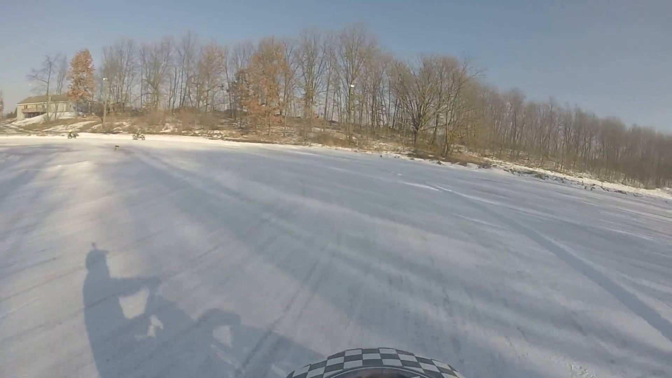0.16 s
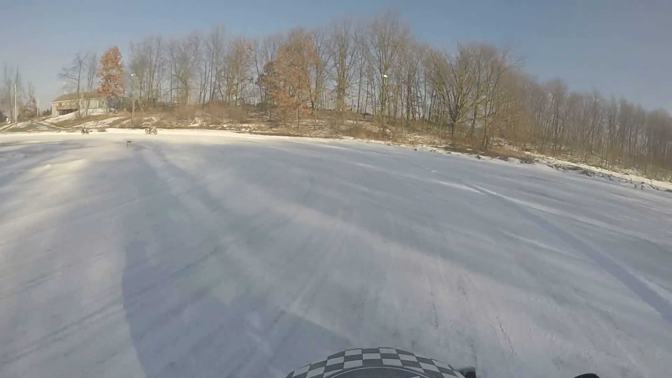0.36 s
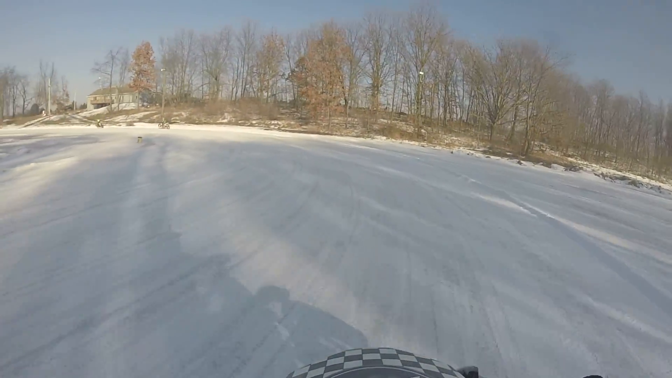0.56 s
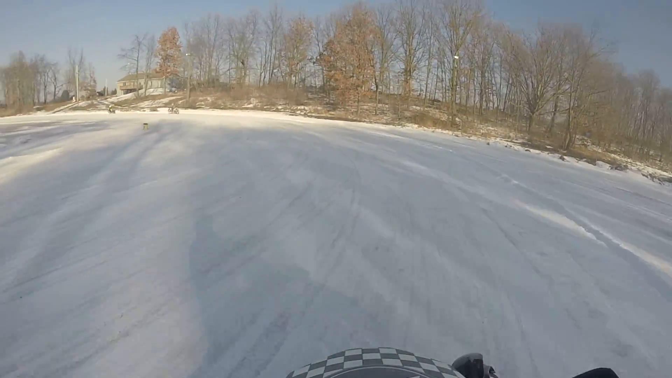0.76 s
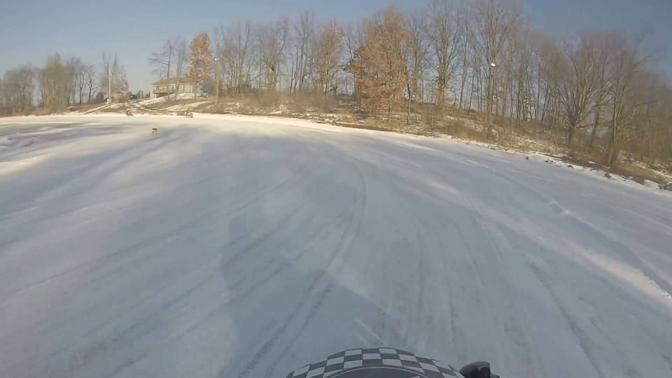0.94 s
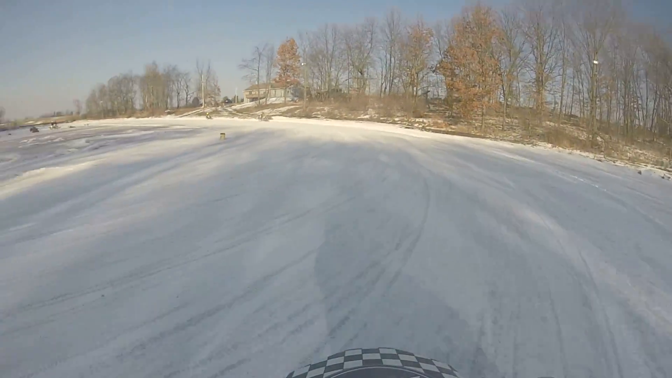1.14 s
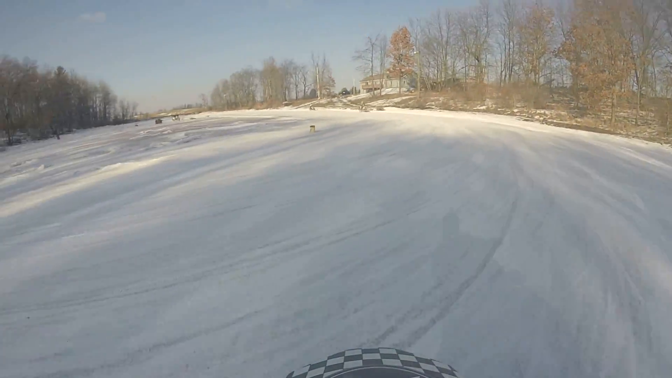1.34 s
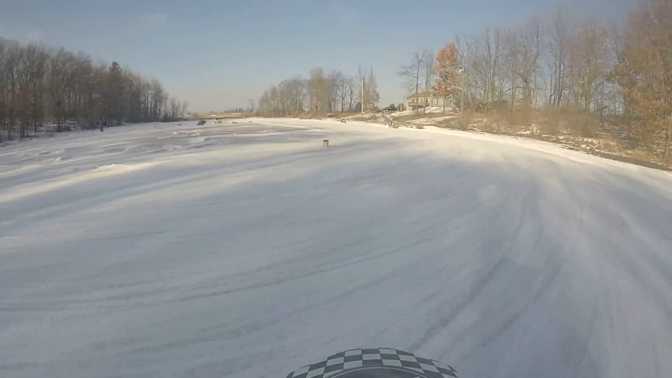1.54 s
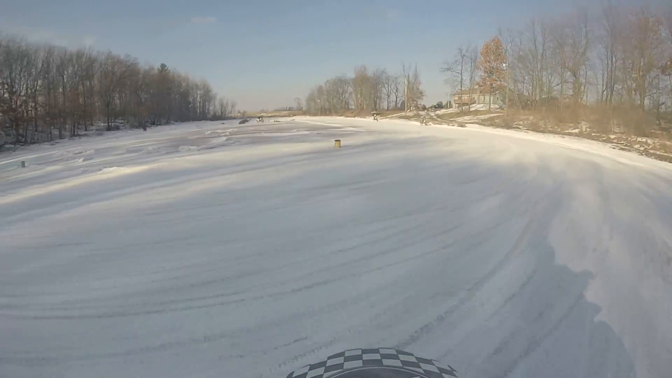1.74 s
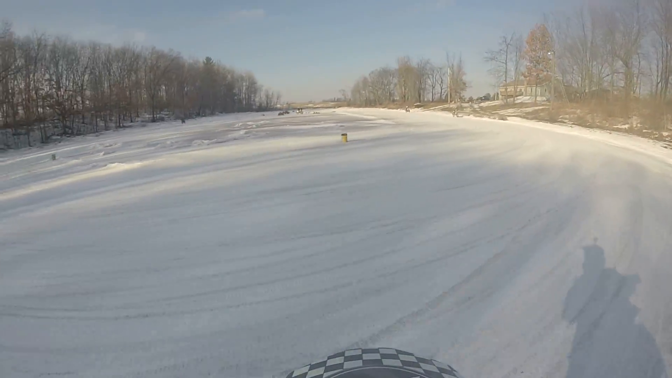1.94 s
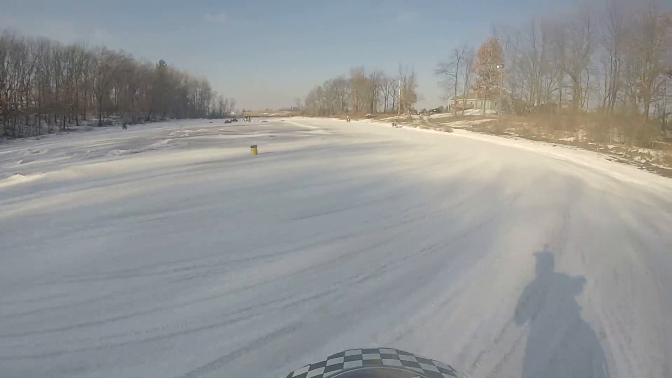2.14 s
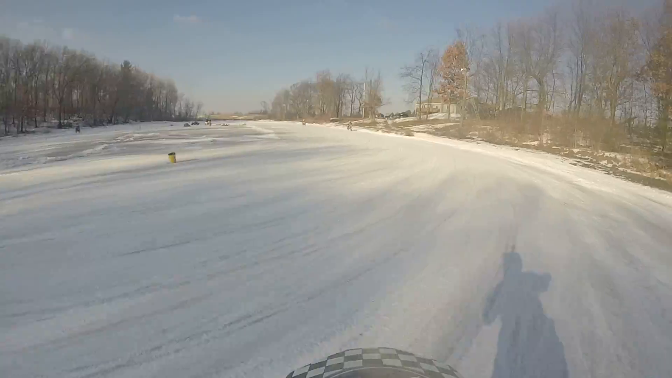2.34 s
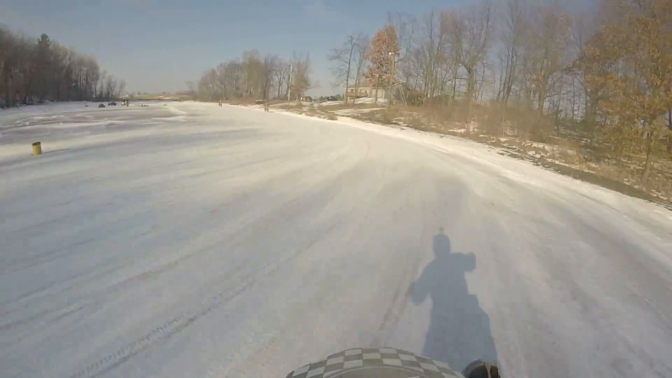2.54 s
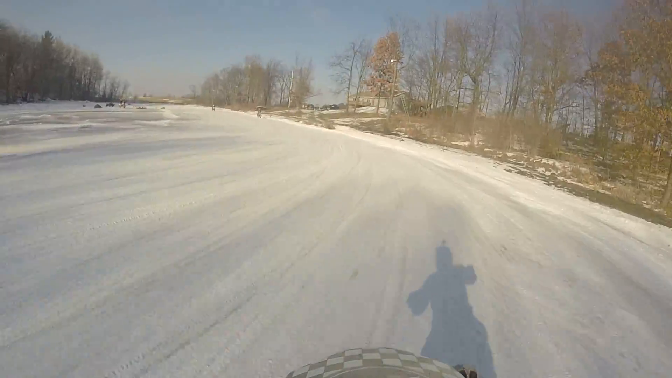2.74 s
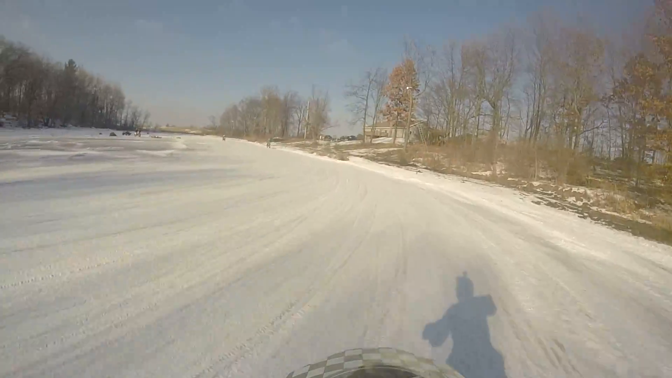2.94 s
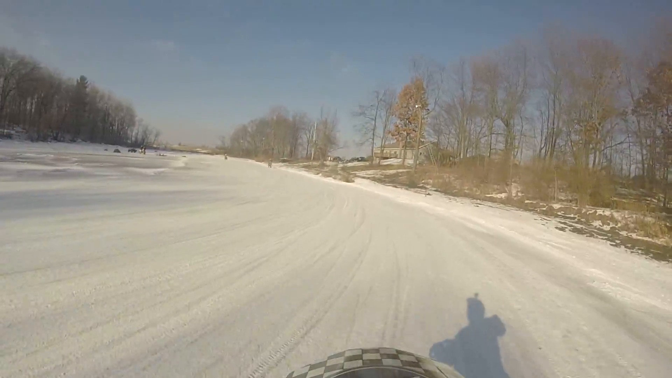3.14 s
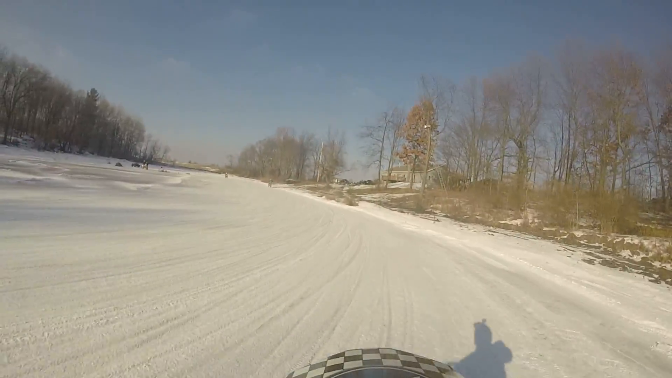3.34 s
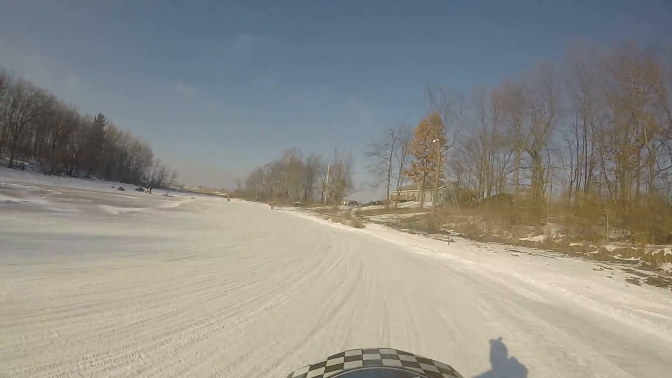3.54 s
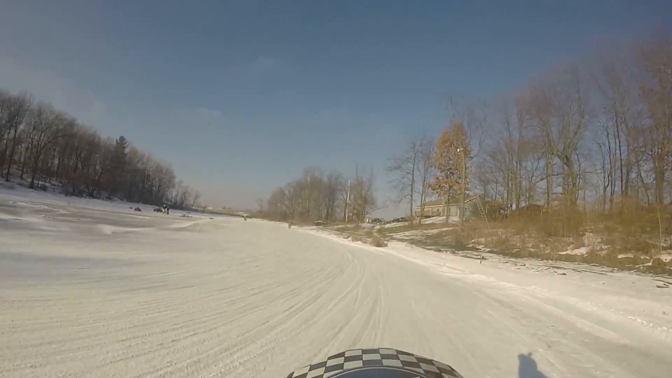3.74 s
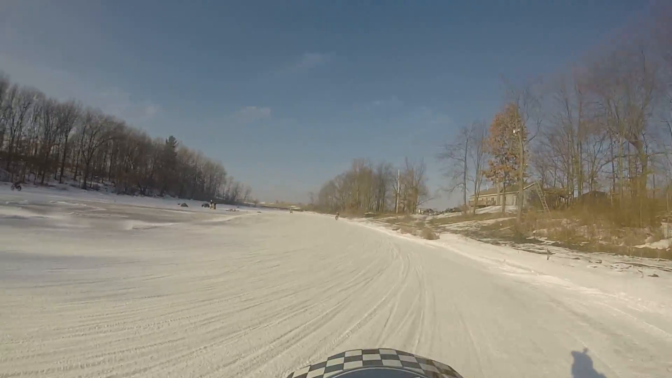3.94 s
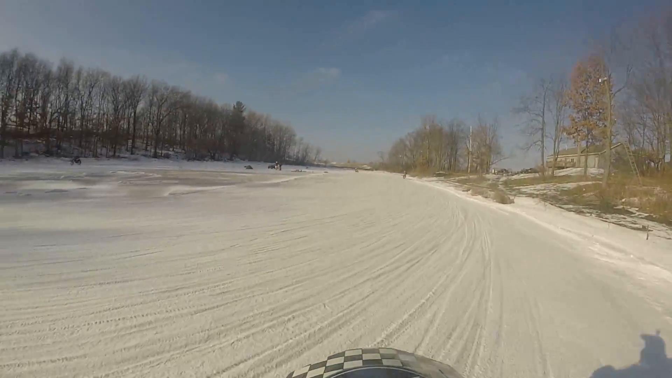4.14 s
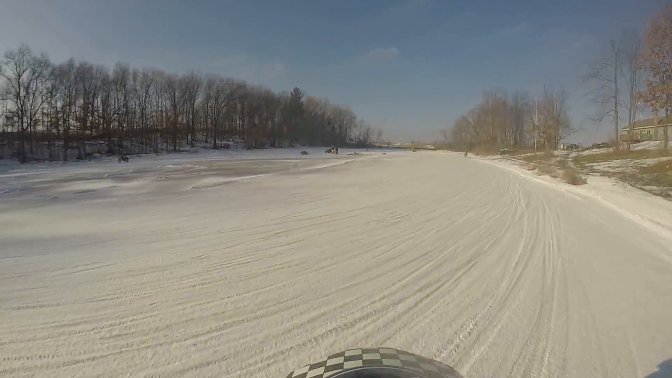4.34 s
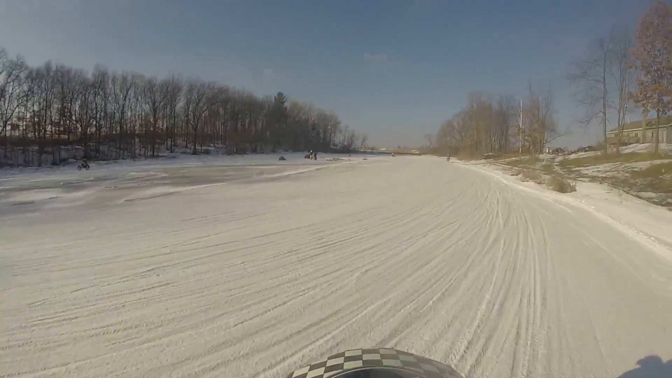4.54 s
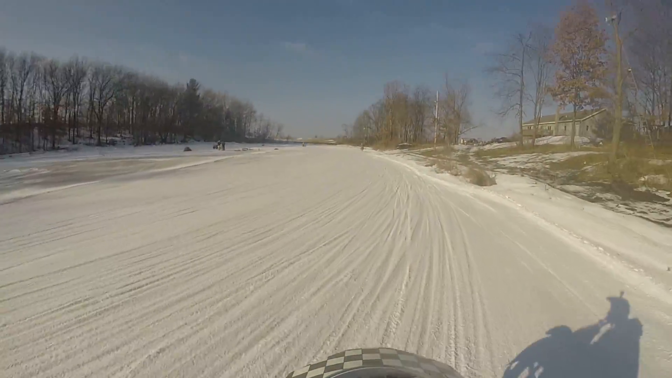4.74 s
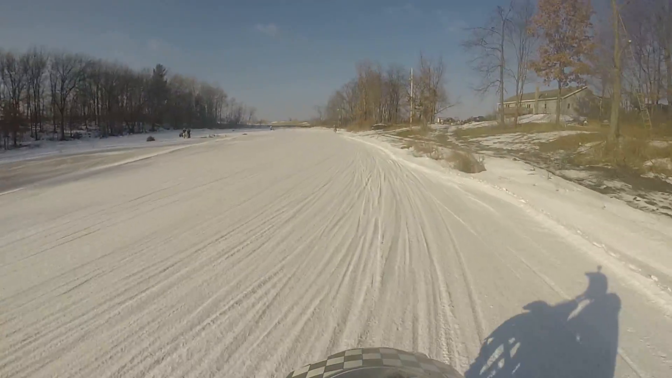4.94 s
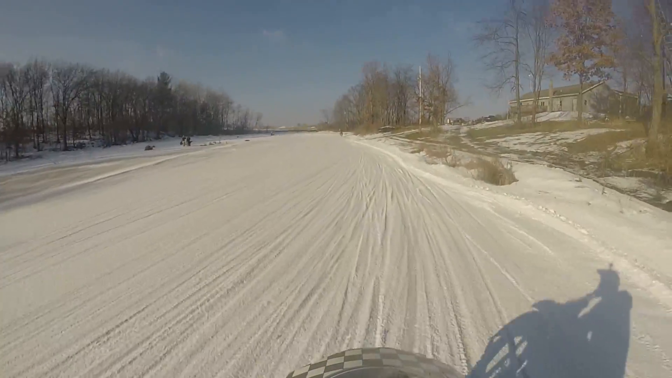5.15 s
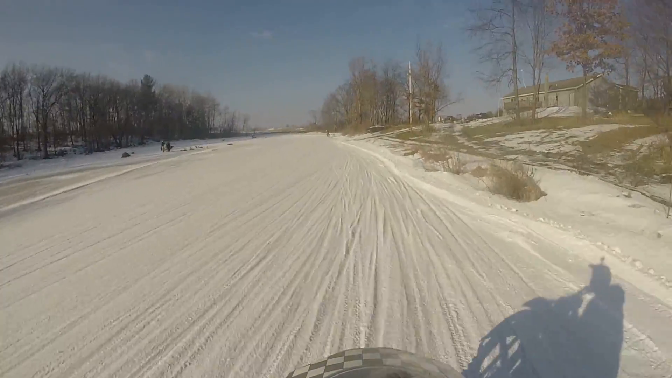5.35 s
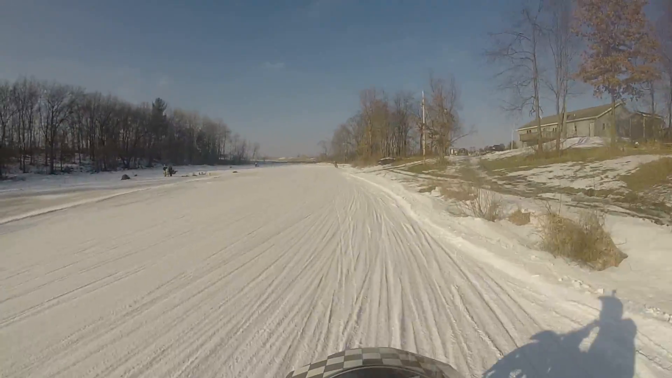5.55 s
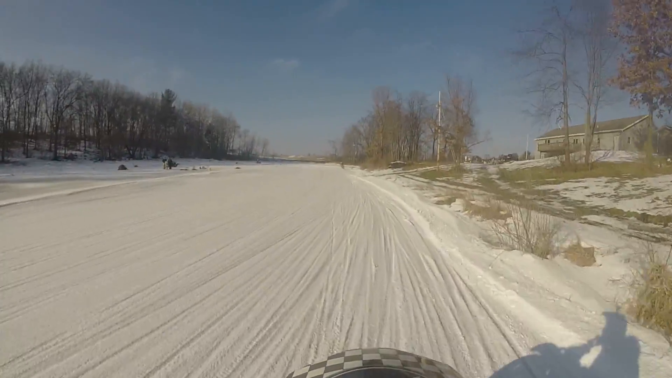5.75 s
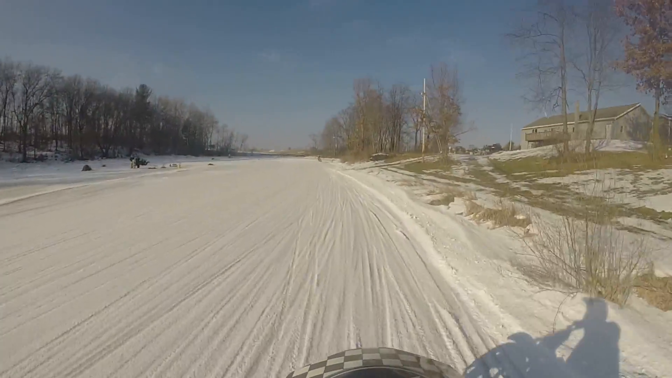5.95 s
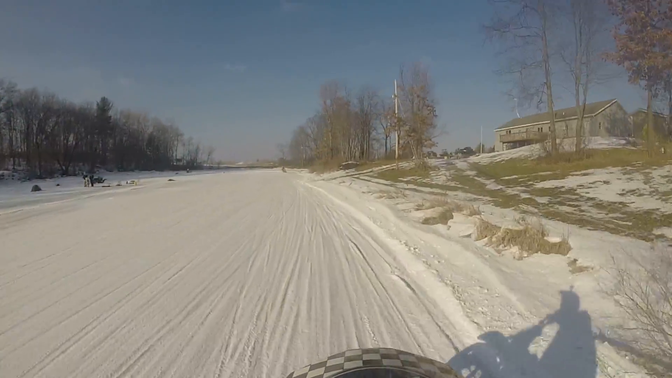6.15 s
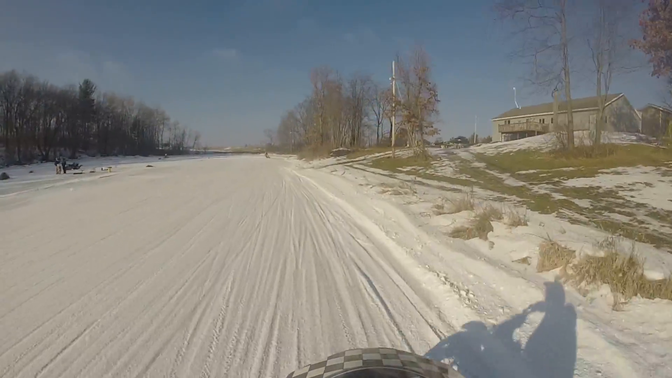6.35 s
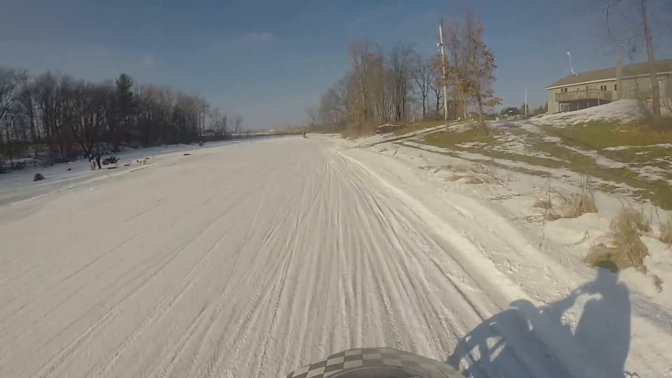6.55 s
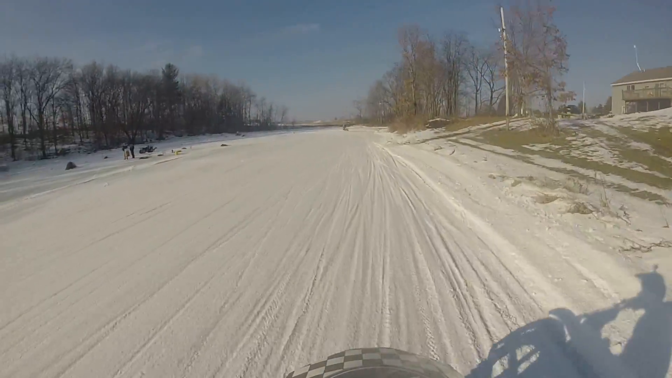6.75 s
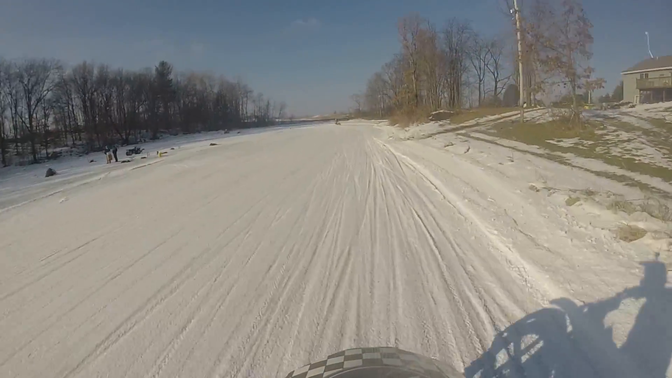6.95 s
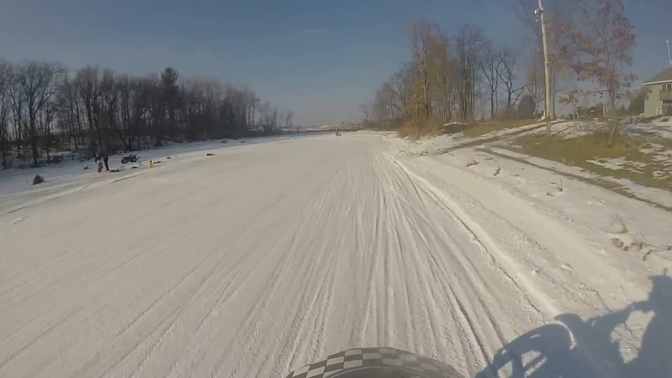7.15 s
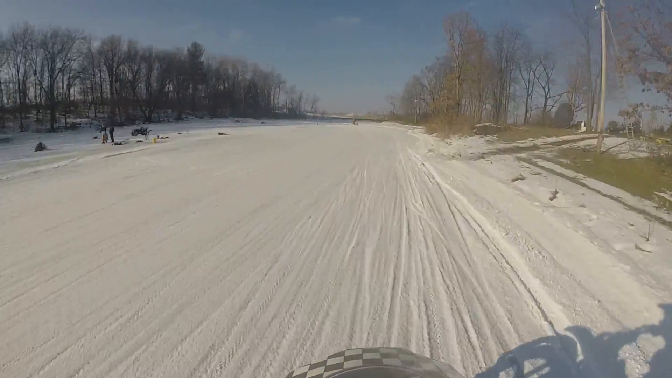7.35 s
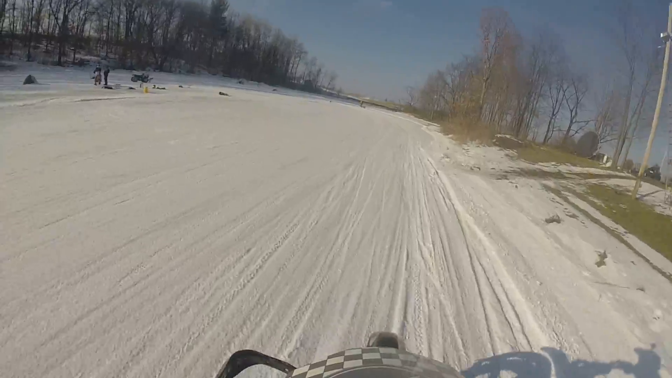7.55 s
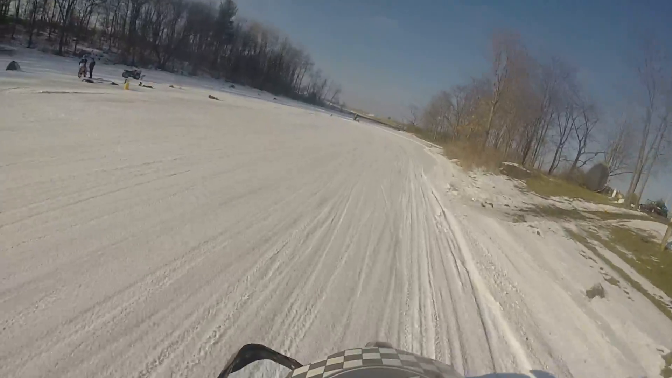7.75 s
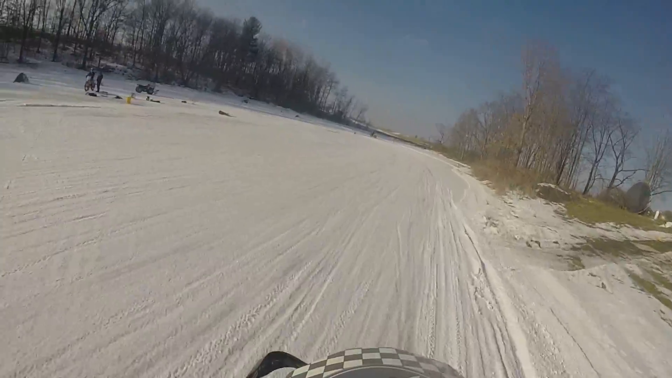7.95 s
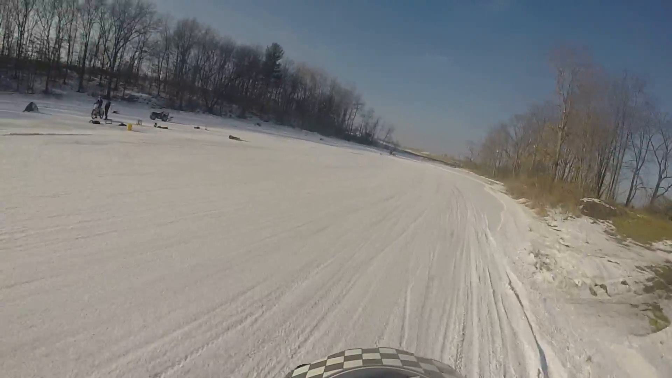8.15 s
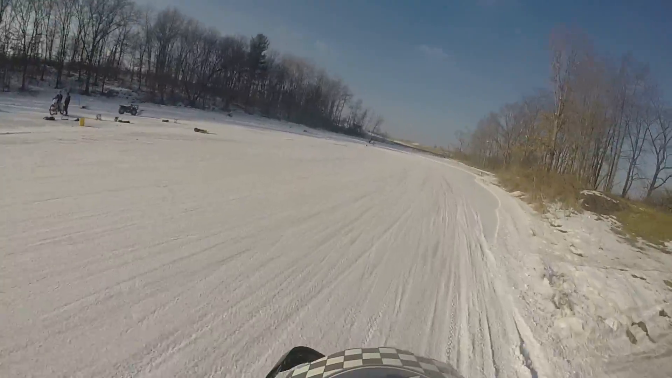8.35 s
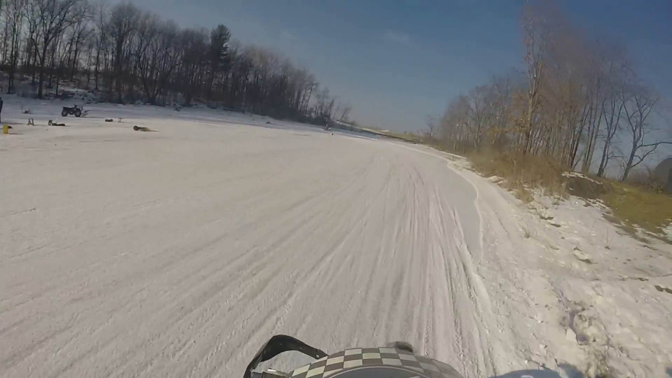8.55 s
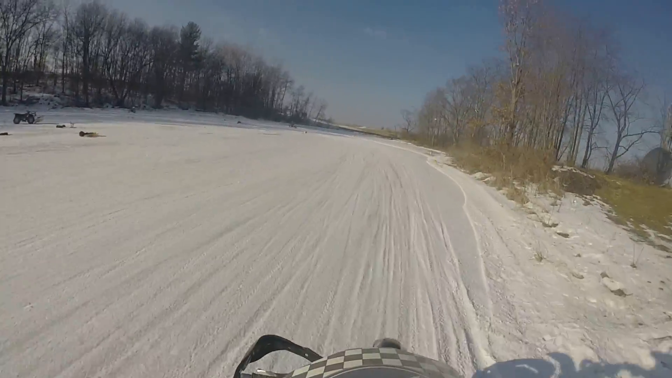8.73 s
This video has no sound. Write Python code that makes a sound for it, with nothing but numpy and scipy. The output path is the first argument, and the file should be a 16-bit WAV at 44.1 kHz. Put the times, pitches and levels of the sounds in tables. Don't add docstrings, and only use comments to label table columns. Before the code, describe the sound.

A single-cylinder motorcycle thuds across a frozen lake, briefly coasts, pulls hard, then backs off, under constant boxed-in wind and tyre roar.

```python
import sys
import numpy as np
from scipy import signal
from scipy.fft import rfft, irfft, next_fast_len
from scipy.io import wavfile
from scipy.ndimage import uniform_filter1d

SR = 44100
rng = np.random.default_rng(int(sys.argv[2]) if len(sys.argv) > 2 else 0)


def transcribe(signal):
    frames = np.atleast_2d(signal).T
    limited = np.clip(frames, -1, 1)
    pcm = np.round(limited * 32767).astype(np.int16)
    wavfile.write(sys.argv[1], SR, pcm)


def undo_db(level):
    steps = np.asarray(level, float) / 20
    return 10 ** steps


N = 392049
TIMES = np.arange(N) / SR


def evened(x):
    return x / np.sqrt(np.mean(x ** 2) + 1e-20)


def columns(rows, t=TIMES):
    s, *values = np.transpose(rows)
    return [np.interp(t, s, v) for v in values]


def shaped(x, db_of_hz):
    size = next_fast_len(N)
    gain = undo_db(db_of_hz(np.fft.rfftfreq(size, 1 / SR)))
    return irfft(rfft(x, size) * gain, size)[:N]


def drift(count, size):
    once = uniform_filter1d(rng.standard_normal(count), size)
    return evened(uniform_filter1d(once, size))


def bumps(rows, power):
    t = TIMES[::64]
    total = sum(db * np.exp(-abs(2 * (t - s) / length) ** power) for s, db, length in rows)
    return np.interp(TIMES, t, total)


# centre_hz [Hz], width_hz [Hz], level_db [dB]
HOUSING_MODES = [(1065.6, 45, 8), (1225, 162, 6.5), (2050, 505, -6.5), (2448, 477, 14), (3337, 140, -4),
                 (3500, 330, 5.5), (3763, 76, -17), (4936, 470, -10.5), (6080, 500, 8), (6800, 180, -5),
                 (8220, 790, -8), (9720, 2100, 5), (11670, 540, -7), (12600, 550, 4)]


def housing_db(hz):
    return sum(db / (1 + (2 * (hz - f) / width) ** 2) for f, width, db in HOUSING_MODES)


def hiss():
    noise = rng.standard_normal(N)
    return undo_db(-80) * evened(shaped(noise, lambda hz: -20 * np.log10(1 + ((hz - 11900) / 800) ** 2)))


# start_s [s], pitch_hz [Hz], level_db [dB]
FAR_ENGINE = [
    (7.9, 179, -78),
    (8.2, 181.6, -59),
    (8.5, 188.8, -52),
    (8.8, 197, -52),
    (8.89, 207, -69),
]


def far_engine():
    hz, db = columns(FAR_ENGINE)
    turns = np.cumsum(hz) / SR
    overtones = 0.94 * np.sin(4 * np.pi * turns) + np.sin(6 * np.pi * turns)
    return undo_db(db) * (TIMES > FAR_ENGINE[0][0]) * overtones


# start_s [s], wind_db [dB], turn [how far the rider's head is turned, brightening the
WIND_AND_HEAD = [(0, -30.5, 0.7), (.2, -30.5, 0.63), (.8, -31, 0.33), (1.05, -32, 0), (1.45, -32.5, 0),
                 (2.5, -31.5, 0.1), (2.8, -32, .3), (3.3, -30, 0.48), (4.1, -28, 1), (4.5, -28, 0.53),
                 (4.85, -25.5, .8), (4.97, -23.5, 0.34), (6.1, -19.5, 0.48), (7.2, -21, 0.27),
                 (7.6, -25, 0.58), (8.15, -29, 0.81), (8.45, -31, .8), (8.89, -25, 0.16)]
WIND_MID_DB = -22


def wind_and_head(t=TIMES):
    return columns(WIND_AND_HEAD, t)


# start_s [s, at the centre], level_db [dB over the rumble], length_s [s]
GUST_SWELLS = [(.27, 9, .15), (.54, 6, 0.13), (.69, 13, 0.071), (1.3, 4, .1), (1.76, 16, 0.13),
               (1.97, 10, .06), (2.1, 13, 0.065), (2.5, 9, .12), (3.24, 15, 0.06), (3.69, 13, 0.11),
               (4.14, 3, .1), (4.72, 15, 0.2), (5.15, 11, 0.38), (5.4, 4, .08), (5.71, 12, 0.13),
               (5.88, 10, .1), (6.3, 8, .15), (6.55, 7, .15), (6.84, 9, .08), (7.22, 9, .15), (7.6, 5, .1),
               (8.0, 13.5, 0.088), (8.3, 9, 0.39), (8.7, 7, .15)]


def gust_colour_db(hz):
    bounce = 9 / (1 + ((hz - 37) / 8) ** 2)
    return bounce - 10 * np.log10((1 + (hz / 42) ** 8) * (1 + (24 / (hz + .1)) ** 4))


def gusts():
    level_db = -45 + 0.4 * (wind_and_head()[0] - WIND_MID_DB) + bumps(GUST_SWELLS, power=1.8)
    rumble = evened(shaped(rng.standard_normal(N), gust_colour_db))
    power = uniform_filter1d(rumble ** 2, size=3000)
    rumble = evened(rumble / (power + .03) ** .42)
    lumps_db = 3 * drift(count=N, size=2500)
    return undo_db(level_db + lumps_db) * rumble


# pitch_hz [Hz], level_db [dB per Hz]
AIR_SPECTRUM = [(40, -35), (150, -12.5), (300, -17), (600, -22), (850, -17), (1050, -11.5), (1700, -5.5),
                (3000, -8.5), (4500, -10), (6500, -27.5), (9000, -37.5), (11500, -44), (13500, -56),
                (15500, -66)]


def roar():
    frames, hz = N // 128 + 5, np.fft.rfftfreq(512, 1 / SR)
    wind_db, turn = uniform_filter1d(wind_and_head(np.arange(frames) * 128 / SR), size=30)
    level_db = wind_db + 1.5 + 0.39 * drift(count=frames, size=25)

    def part_db(db, per_wind_db, turn_lift_db, sway_db):
        sway = sway_db * drift(count=frames, size=30)
        return db + per_wind_db * (wind_db - WIND_MID_DB) + turn_lift_db * turn + sway

    whistle_db = part_db(-7, 0.05, -2, 0.3)
    shrill_db = part_db(-20.5, .25, 5.5, 0.44)
    hiss_db = part_db(-28.5, 0.09, 6.5, 0.5)
    a, b, patches = rng.standard_normal((frames, 257, 3)).T
    patches = evened(uniform_filter1d(uniform_filter1d(patches, 8, 0), 14, 1))
    flicker = evened(uniform_filter1d(rng.standard_normal(frames), 5))

    wash = 1 / (1 + (hz / 600) ** 4)
    whistle = 1 / (1 + (hz / 1900) ** 8) - wash
    shrill = 1 / (1 + ((hz - 6000) / 450) ** 4) + .9 / (1 + ((hz - 12600) / 500) ** 4)
    top = 1 / (1 + (6800 / (hz + 1)) ** 8)
    turn_band = 1 / (1 + (3000 / (hz + 1)) ** 8) - top

    field_db = level_db + 0.43 * patches + 0.22 * flicker
    field_db += whistle[:, None] * (whistle_db + 8.5)
    field_db -= 0.8 * wash[:, None] * (level_db + 19.5)
    field_db += shrill[:, None] * (shrill_db - hiss_db - 7)
    field_db += top[:, None] * (hiss_db + 32.5)
    field_db += turn_band[:, None] * 6.5 * (turn - .5)
    air = signal.istft((a + 1j * b) * undo_db(field_db), nperseg=512, noverlap=384)[1][:N]
    f, db = np.transpose(AIR_SPECTRUM)
    return undo_db(-10) * shaped(air, lambda hz: np.interp(np.log(hz + 1), np.log(f), db) + housing_db(hz))


# start_s [s], length_s [s], slip_rate_hz [slips per s], ring_hz [Hz], level_db [dB]
CLIP_BUZZES = [(.03, 0.19, 190, 6500, -48), (.27, 0.2, 160, 5350, -40.5), (.33, 0.15, 190, 6400, -53),
               (.56, 0.26, 220, 5330, -46.5), (.68, .12, 210, 6400, -48), (0.897, 0.1, 120, 5330, -46.5),
               (1.19, 0.32, 170, 5280, -39.5), (1.27, 0.2, 140, 7740, -55), (1.52, 0.39, 200, 5300, -46.5),
               (1.55, 0.43, 150, 7700, -54.5), (1.852, 0.41, 220, 5400, -56)]


def buzz():
    out, t = np.zeros(N), np.arange(300) / SR
    envelope = undo_db(-60 * t / 0.006) * (1 - np.exp(-t / 0.0003))
    for s, length, per_s, hz, db in CLIP_BUZZES:
        chance = rng.standard_normal(100)
        steps = np.cumsum(1 + 0.06 * chance) / per_s
        steps = steps[steps < length]
        strength = undo_db(2.5 * chance[::-1][:len(steps)])
        slips = np.zeros(N)
        slips[((s + steps) * SR).astype(int)] = np.sin(np.pi * steps / length) ** 0.8 * strength
        tick = envelope * (np.sin(2 * np.pi * hz * t) + 0.5 * np.sin(2 * np.pi * 1.16 * hz * t))
        out += undo_db(db + 18) * signal.oaconvolve(slips, tick)[:N]
    return undo_db(-2.5) * shaped(out, lambda hz: 0.2 * housing_db(hz))


def firings(cycles, angle, spread_db, jitter):
    draws = rng.standard_normal((400, 2))
    whole = np.arange(int(cycles[-1] - angle) + 1)
    at = np.interp(whole + angle + jitter * draws[whole, 0], cycles, np.arange(N)).astype(int)
    clicks = np.zeros(N)
    clicks[at] = undo_db((spread_db * np.ones(N))[at] * np.clip(draws[whole, 1], -2, 2))
    return clicks


def ring(modes, rise_s):
    t = np.arange(3000) / SR
    dying = sum(undo_db(db - 60 * t / t60) * np.sin(2 * np.pi * hz * t) for hz, db, t60 in modes)
    return -dying * (1 - np.exp(-t / rise_s))


def blow(cycles, db, modes, angle, rise_s, spread_db, jitter):
    clicks = undo_db(db) * firings(cycles, angle, spread_db, jitter)
    return signal.oaconvolve(clicks, ring(modes, rise_s))[:N]


def puffs(cycles, angle, spread_db, fall_s):
    t = np.arange(2000) / SR
    burst = np.exp(-t / fall_s) * (1 - np.exp(-t / 0.0014))
    gate = signal.oaconvolve(firings(cycles, angle, spread_db, jitter=0.014), burst)[:N]
    return rng.standard_normal(N) * gate


# start_s [s], firing_rate_hz [firings per s]
ENGINE_SPEED = [(0.0, 31.966), (0.26, 31.986), (1.46, 30.592), (2.11, 30.859), (2.44, 28.008),
                (2.99, 28.877), (3.34, 28.23), (3.87, 30.395), (4.06, 30.96), (4.86, 32.81), (5.1, 32.924),
                (5.39, 33.794), (6.03, 34.406), (6.29, 34.469), (6.55, 34.956), (6.68, 32.125),
                (6.86, 32.656), (8.89, 28.231)]


def firing_rate():
    return columns(ENGINE_SPEED)[0]


# start_s [s], opening [throttle, 0-1], strain [load on the engine, 0-1]
THROTTLE_HAND = [(0, 0.38, 0.18), (1, .3, 0.27), (2.26, 0.3, 0.26), (2.31, 0, 0.4), (2.86, 0, 0),
                 (2.885, 0.1, 0.1), (2.97, 0.2, 0.3), (3.3, 0.48, 0.1), (3.55, 0.5, 0.7), (3.9, 0.72, 0.99),
                 (4.25, 0.84, 0.88), (4.6, 1, 0.52), (4.9, 0.96, 0.27), (6.58, 0.9, 0.23), (6.65, 0.18, 0),
                 (7.5, 0.09, 0), (8.2, 0.06, 0), (8.89, 0.04, 0.1)]


def load():
    opening, strain = np.clip(columns(THROTTLE_HAND), 0, 1.5)
    burn = np.minimum(opening / .28, 1)
    return opening, strain, burn


def voice_db(shut_db, burn_db, opening_db, strain_db, burn):
    opening, strain, _ = load()
    return shut_db + burn_db * burn + opening_db * opening + strain_db * strain


FIRST_AT, SECOND_AT, THUMP_AT = .28, .434, .41
STEADY, LOOSE = .002, .008


def uneven_db(burn):
    return 4 + (.6 - 4) * burn


def seesaw(cycles):
    return np.cos(np.pi * (cycles - SECOND_AT))


# pitch_hz [Hz], level_db [dB], t60_s [s]
FIRST_MODES = [(296, 2, 0.023), (191.6, -8, 0.05), (397, -14, 0.026), (486, -12.5, 0.032)]
CRACK_MODES = [(486, -4.5, 0.044), (707, 4.5, 0.02), (810, -8, 0.059)]
SECOND_MODES = [(240.6, 3, 0.017), (369.2, -8.5, 0.035), (423, -31.5, 0.11)]


def exhaust_thuds(cycles):
    opening, _, burn = load()
    first_db = voice_db(-44.5, 24.5, 1, 8.5, burn)
    crack_db = voice_db(-61.5, 12, 12.5, 14.5, burn)
    wobble = np.clip(opening, 0, 1) ** 2 * (1 + 0.35 * drift(count=N, size=6000))
    leak = 0.018
    second_db = -10 + 20 * np.log10(opening + leak) + 1.8 * wobble * seesaw(cycles)
    out = blow(cycles, first_db, FIRST_MODES, FIRST_AT, rise_s=0.0023, spread_db=0.5, jitter=STEADY)
    out += blow(cycles, crack_db, CRACK_MODES, FIRST_AT + 0.013, rise_s=0.00096, spread_db=1.5, jitter=STEADY)
    out += blow(cycles, second_db, SECOND_MODES, SECOND_AT, rise_s=0.0023, spread_db=uneven_db(burn),
                jitter=STEADY)
    return out


# pitch_hz [Hz], level_db [dB], t60_s [s]
BOOM_MODES = [(170.3, 0, 0.08)]
# start_s [s, at the centre], extra_boom_db [dB]
LATE_POPS = [(2.37, 12), (2.41, -2), (2.51, 2), (2.69, 7), (2.83, 12), (7.13, 6), (7.3, 3), (7.51, 9),
             (7.57, 11), (7.64, 9), (7.71, 12), (8.07, 9), (8.2, 7), (8.27, 8), (8.37, 4), (8.44, 2),
             (8.57, 1), (8.64, 8), (8.748, 12)]


def silencer_boom(cycles):
    opening, _, burn = load()
    pops_db = bumps([(s, db, .045) for s, db in LATE_POPS], power=4)
    boom_db = voice_db(-40.5, 10, 5, 5, np.minimum(opening / .16, 1)) + pops_db
    return blow(cycles, boom_db, BOOM_MODES, THUMP_AT, rise_s=0.00033, spread_db=0.2 * uneven_db(burn),
                jitter=STEADY)


# pitch_hz [Hz], level_db [dB], t60_s [s]
THUMP_MODES = [(125, -3, 0.042), (96, -11, 0.055)]


def coasting_thump(cycles):
    burn = load()[2]
    thump_db = voice_db(-24.5, 3.5, -19, -8, burn)
    return blow(cycles, thump_db, THUMP_MODES, THUMP_AT, rise_s=0.00013, spread_db=0.5 * uneven_db(burn),
                jitter=LOOSE)


def crank_hum(cycles):
    hum_db = -38 + 0.9 * (firing_rate() - 31)
    return undo_db(hum_db) * (np.cos(4 * np.pi * cycles) - 0.15 * np.cos(2 * np.pi * cycles))


# pitch_hz [Hz], level_db [dB], t60_s [s]
RASP_MODES = [(1672, -11.5, 0.018), (1797, -5, 0.022)]


def rasp(cycles):
    rasp_db = voice_db(-47, 8, -0.5, 15.5, load()[2])
    rush = puffs(cycles, FIRST_AT, spread_db=0.5, fall_s=0.0074)
    rush += puffs(cycles, SECOND_AT, spread_db=1.5, fall_s=0.007)
    band = shaped(rush, lambda hz: -20 * np.log10(1 + ((hz - 1680) / 170) ** 2))
    out = undo_db(rasp_db - 4) * evened(band)
    for angle in (FIRST_AT + .02, SECOND_AT + 0.022):
        out += blow(cycles, rasp_db + 7.5, RASP_MODES, angle, rise_s=0.00087, spread_db=2.5, jitter=LOOSE)
    return out


def spit(cycles):
    opening, strain, _ = load()
    level_db = -65.5 + 38.5 * strain ** 1.3 - 15.5 * opening + 2.5 * seesaw(cycles)

    def colour_db(hz):
        return 0.58 * housing_db(hz) - 2.8 * hz / 1000 - 20 * np.log10(1 + (4000 / (hz + 1)) ** 2)

    jet = puffs(cycles, FIRST_AT + 0.096, spread_db=0, fall_s=.0055)
    return undo_db(level_db) * evened(shaped(jet, colour_db))


def engine():
    cycles = .074 + np.cumsum(firing_rate()) / SR
    pipe = exhaust_thuds(cycles) + silencer_boom(cycles)
    pipe = shaped(pipe, lambda hz: -5 / (1 + (2 * (hz - 98) / 28) ** 2))
    return pipe + coasting_thump(cycles) + crank_hum(cycles) + rasp(cycles) + spit(cycles)


def scene():
    return (hiss() + far_engine() + gusts() + roar() + buzz() + engine())[None]


def top_cut(x):
    return signal.sosfilt(signal.butter(12, 15150, fs=SR, output="sos"), x)


def record(dry):
    heard = signal.lfilter(*signal.butter(1, 6, "high", fs=SR), dry)
    hz, t, z = signal.stft(heard, SR, nperseg=1024)
    hz = hz[:, None]
    power = abs(z) ** 2
    luck = evened(uniform_filter1d(rng.standard_normal((len(t), len(hz))), size=7, axis=1)).T
    margin_db = -70.5 - 3.5 * (hz - 13600) / 1000 + 3 * luck
    nearby = uniform_filter1d(power, size=7, axis=1)
    masked = nearby < power.sum(1, keepdims=True) * undo_db(margin_db) ** 2
    z = np.where(masked & (hz > 13300), z * undo_db(-30), z)
    mix = signal.istft(z, SR, nperseg=1024)[1][:, :N]
    return top_cut(mix)


dry = scene()
out = record(dry)
transcribe(out)
```